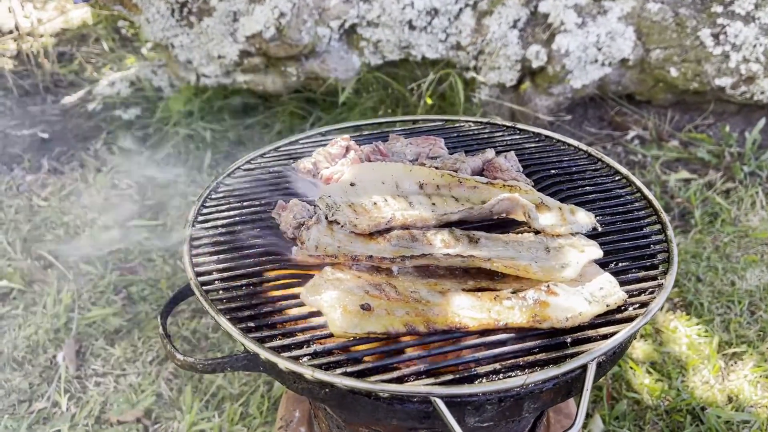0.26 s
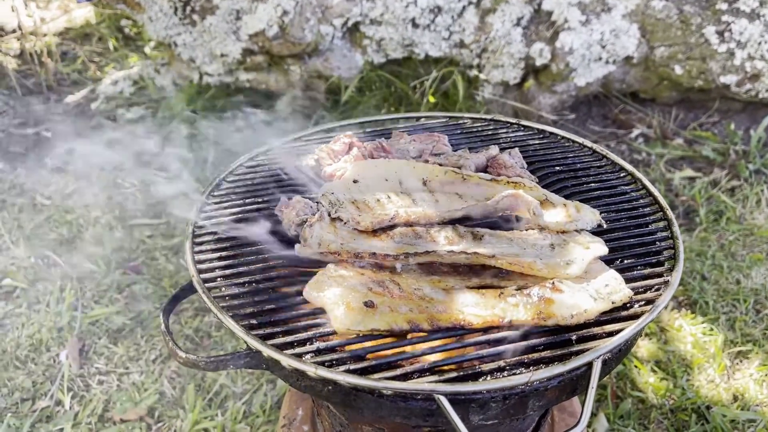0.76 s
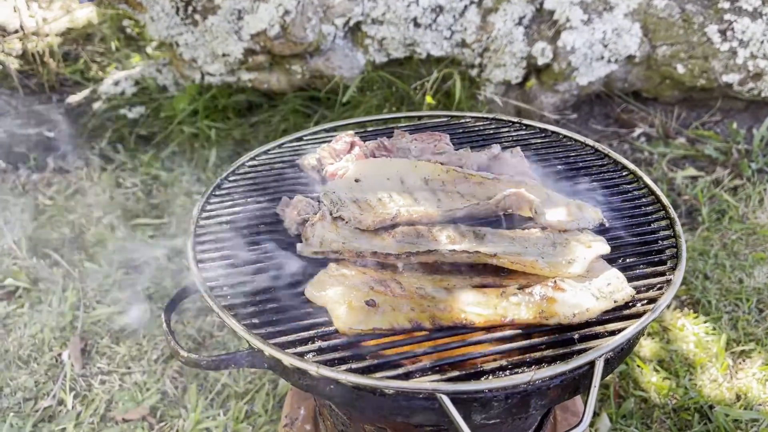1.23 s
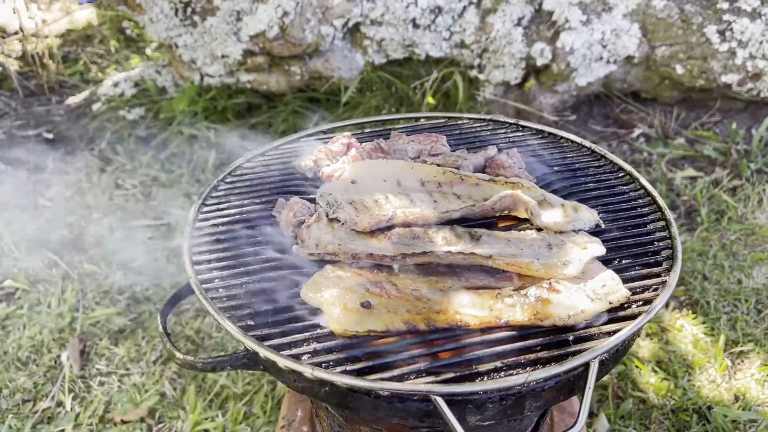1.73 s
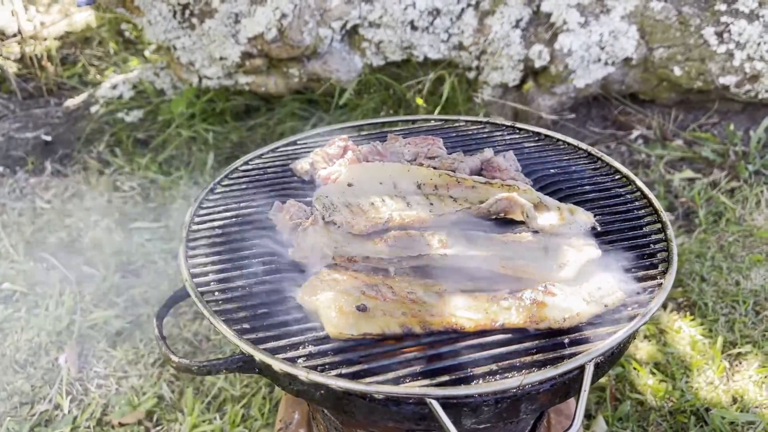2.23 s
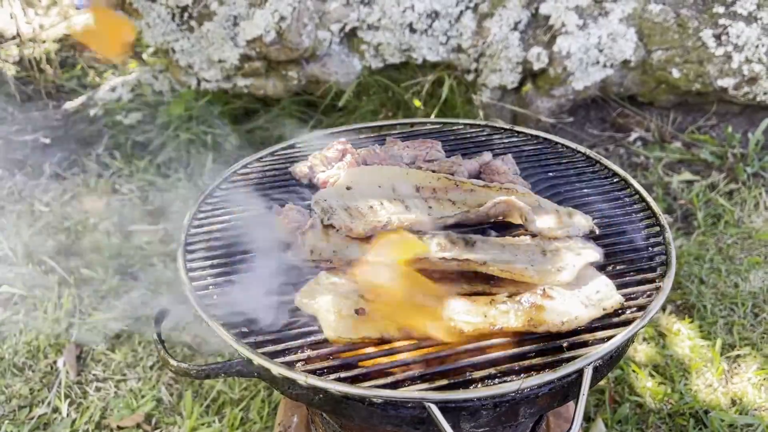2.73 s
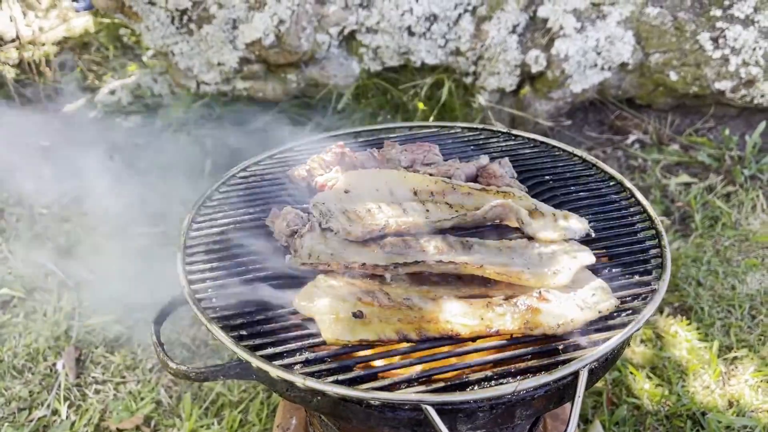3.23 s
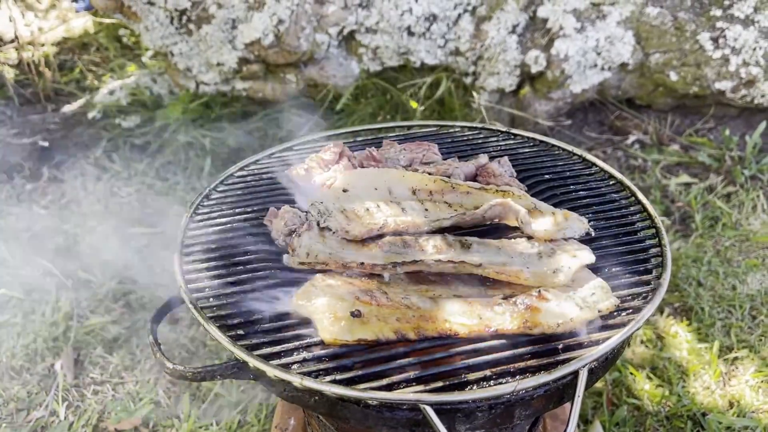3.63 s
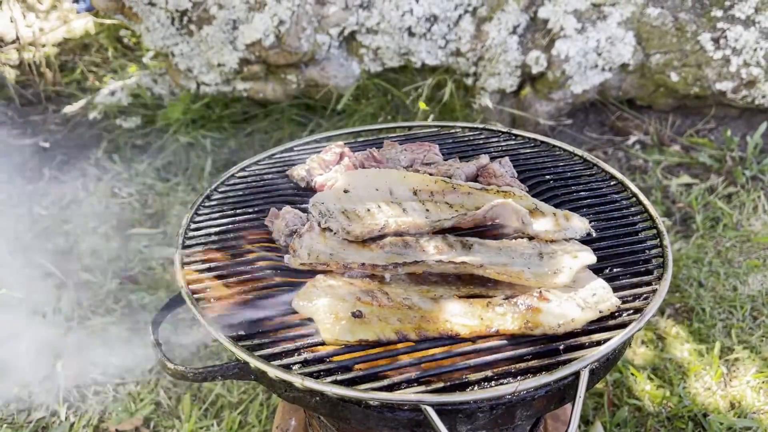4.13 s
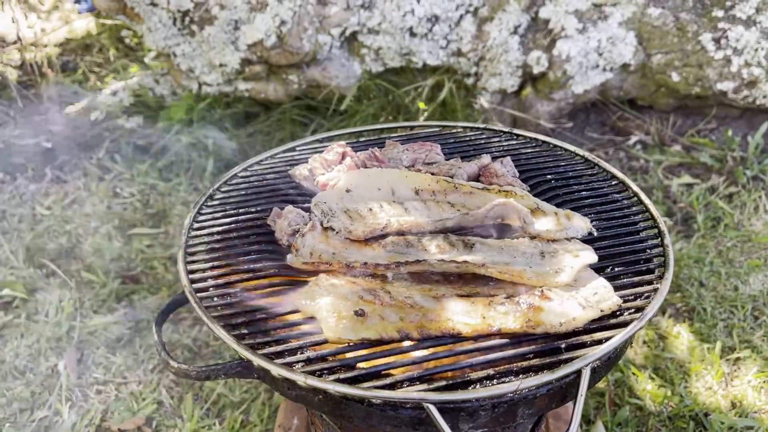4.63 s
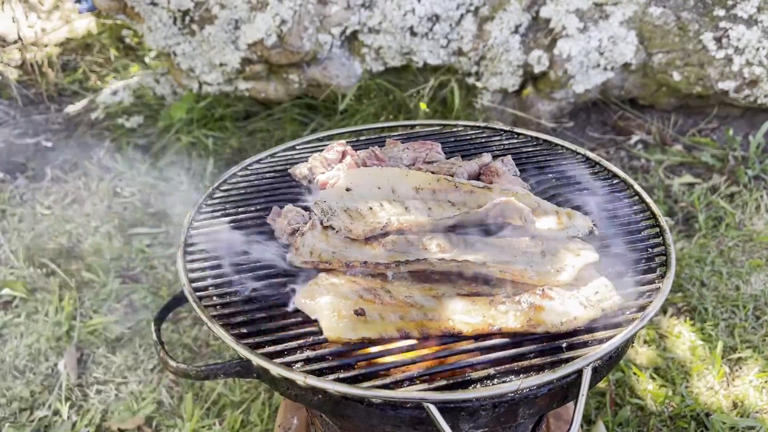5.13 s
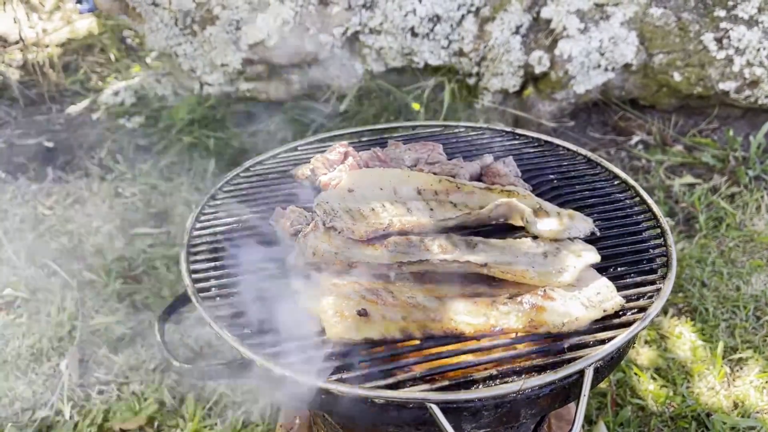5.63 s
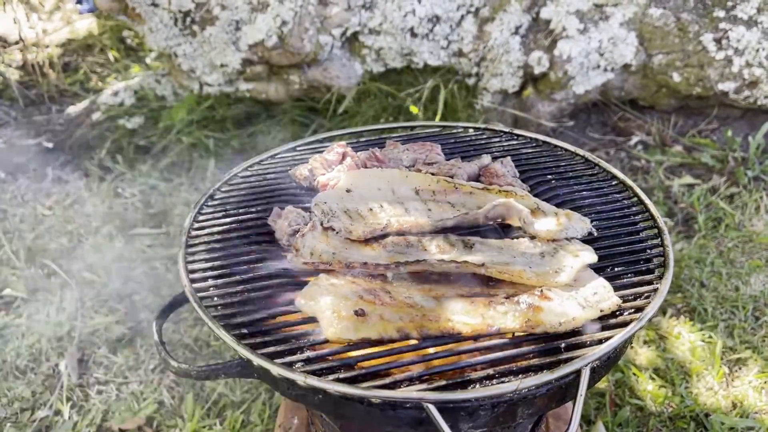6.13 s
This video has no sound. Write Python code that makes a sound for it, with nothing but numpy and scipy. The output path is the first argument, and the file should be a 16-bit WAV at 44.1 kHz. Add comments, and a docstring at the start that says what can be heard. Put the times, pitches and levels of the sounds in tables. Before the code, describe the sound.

Close outdoor stereo pickup of meat frying over hot coals: dense, fine, treble-rich crackling, airy steam and irregular sharp fat pops. The opening is fairly quiet with little wind. Midway, dripping fat makes the sizzle surge, and gusts slap the microphone with low, rough thumps. Later the wind weakens but returns in bumps, over louder sizzling and a slightly hollow rush from the metal bowl.

```python
"""Fatty meat sizzles and pops over charcoal outdoors while gusts buffet a close two-port microphone.
Clumped bubble bursts on a smooth hiss make the sizzle of the fat, lit up by the microphone's treble
resonance, the steam on the coals and the rush in the hollow of a round steel bowl; bigger bubbles snap
and ring the bowl. Wind is coloured noise that swells in lumps, with single eddies that slap the ports;
a faint murmur lies behind. The two channels differ in level and phase."""
import sys
import numpy as np
from scipy.fft import rfft, irfft, next_fast_len
from scipy.io import wavfile
from scipy.ndimage import map_coordinates

SR = 44100
rng = np.random.default_rng(int(sys.argv[2]) if len(sys.argv) > 2 else 0)


def wrap_up_sound(samples):
    """Save the sound to the file named by the first command line argument, as 16-bit audio."""
    columns = np.atleast_2d(samples).T
    # keep every value between -1 and 1, then stretch to whole-number steps
    tamed = np.clip(columns, -1, 1)
    steps = np.round(tamed * 32767).astype(np.int16)
    wavfile.write(sys.argv[1], SR, steps)


N = 281358

# colour of the sizzle as the microphone hears it, with its resonance near 11 kHz:
# [f/Hz, relative density/dB]
SIZZLE_COLOUR = [(3000, -26.5), (6500, -19.5), (8400, -11), (10200, -3), (11000, 0.5), (11600, -1.5),
                 (12300, -11), (13200, -20), (15300, -29)]
# colour of the wind's flutter and of the air in a slap: [f/Hz, relative density/dB]
FLUTTER_COLOUR = [(100, -27.5), (200, -1.5), (330, -0.5), (550, -6), (800, -21.5), (1500, -34),
                  (4000, -78.5)]


def grill():
    """Bubble bursts in three colours plus big pops; row 0 is straight sound, row 1 scattered sound."""
    # colour of the steam: [f/Hz, relative density/dB]
    steam_colour = [(300, -22.5), (800, -17), (1330, -11.5), (1520, 1.5), (1800, 1), (2300, -1.5),
                    (3300, -1), (4200, -4.5), (5500, -3.5), (7000, -8), (10000, -9)]
    # big bubbles: [t/s, relative snap level/dB, relative body level/dB, body pitch f/Hz]
    big_bubbles = [(0.1438, -22, -38, 2310), (0.1508, -27.5, -35.0, 2920), (0.1756, -23.5, -40, 2700),
                   (0.2134, -30, -37.5, 3150), (0.2283, -24.5, -35.5, 3670), (0.2417, -38.5, -34, 3550),
                   (0.2826, -19, -37, 3860), (0.2931, -28.5, -30.5, 2660), (0.3713, -19.5, -39.5, 3300),
                   (0.4093, -21.5, -28, 3450), (0.5705, -23.5, -33, 3770), (0.5767, -30.5, -36, 2410),
                   (0.621, -28.5, -34, 2960), (0.6385, -22, -34, 3810), (0.7218, -16.5, -31, 3260),
                   (0.781, -36, -31.5, 3360), (0.8278, -26.5, -29.5, 2340), (0.843, -34, -35, 3850),
                   (0.8731, -24.5, -40.5, 3630), (0.9076, -27.5, -32, 4310), (1.0005, -19.5, -35, 4150),
                   (1.0232, -22.0, -34, 4020), (1.0433, -21.5, -33, 4830), (1.1085, -22.5, -42, 4170),
                   (1.3263, -24, -36.0, 4350), (1.3617, -21.5, -50.5, 4460), (1.3817, -40.5, -35.5, 3540),
                   (1.6178, -27.5, -38, 4730), (1.7475, -27, -37, 3360), (1.7772, -26, -33.0, 3550),
                   (1.8507, -24, -40, 4130), (1.9256, -26.5, -31.5, 2440), (1.9361, -37, -31, 3660),
                   (1.954, -33.5, -30, 2400), (1.9831, -18.5, -30, 2360), (2.0097, -31.5, -31, 2350),
                   (2.065, -22.5, -29, 2210), (2.099, -21.5, -36, 2000), (2.1125, -16, -36, 3880),
                   (2.1466, -19.5, -29, 2735), (2.1927, -19.5, -28.5, 3960), (2.2478, -21, -24.5, 3670),
                   (2.2803, -22.5, -29, 2640), (2.3242, -29, -32, 4040), (2.3489, -21, -29.5, 3280),
                   (2.383, -29, -35.5, 3980), (2.4001, -20.5, -36, 4940), (2.4121, -31.5, -31, 4160),
                   (2.438, -22.5, -39.0, 3800), (2.4814, -24.5, -28, 3200), (2.4878, -29, -35, 3560),
                   (2.4963, -31.5, -38, 4010), (2.6354, -25, -25, 2830), (2.6875, -21.5, -26, 2180),
                   (2.7137, -17.0, -38.5, 3060), (2.8554, -31, -27, 2170), (3.038, -24, -28, 3090),
                   (3.1466, -31, -28.5, 2290), (3.2055, -16, -36, 4450), (3.2833, -30.0, -29.0, 2060),
                   (3.4108, -25.5, -26.5, 2410), (3.4204, -16, -28.5, 2450), (3.4249, -18.5, -25, 3200),
                   (3.793, -16, -25.5, 3080), (3.833, -15, -16.5, 2760), (3.855, -18, -28.5, 3170),
                   (3.8971, -19, -30.5, 3170), (3.989, -24.5, -27.5, 3640), (4.0872, -30.5, -25, 2140),
                   (4.1558, -22.5, -32, 3150), (4.2149, -20.5, -25.5, 3700), (4.2777, -19, -23.5, 3300),
                   (4.3035, -29.5, -24.5, 2660), (4.3294, -23.5, -28.5, 2100), (4.3701, -14, -23.5, 2810),
                   (4.5428, -31, -25, 2260), (4.5718, -30.0, -24, 2000), (4.6062, -20.0, -24.5, 2660),
                   (4.6122, -14.5, -27.5, 3000), (4.6168, -15, -26.5, 2870), (4.6481, -22.5, -26, 2170),
                   (4.7966, -13, -27.0, 2340), (4.98, -27.5, -30, 3210), (5.1347, -27.5, -33, 2300),
                   (5.2352, -20, -30, 3480), (5.3, -33, -27.5, 3220), (5.5651, -22.5, -22, 2330),
                   (5.7835, -23.5, -31, 2390), (5.7902, -14.0, -36, 3940), (5.885, -25, -24.5, 2650),
                   (5.8932, -14.0, -27, 3240), (5.9799, -16.5, -23.5, 2690), (6.0192, -23.5, -26.5, 2300),
                   (6.0869, -25, -27.5, 2300), (6.0948, -27.5, -23, 2110), (6.1554, -18.5, -19.5, 3660),
                   (6.2363, -20.5, -33, 2600)]
    fat_db, steam_db, rush_db = fire()
    fat = filtered(bursting(per_s=1500, spread_db=2.8, smooth=1.0, clumps_db=1.5), causal(SIZZLE_COLOUR))
    steam = filtered(bursting(per_s=900, spread_db=5.5, smooth=1.34, clumps_db=2.0), causal(steam_colour))
    rush = filtered(bursting(per_s=300, spread_db=4, smooth=1.6, clumps_db=1.4), hollow)
    layers = amp(fat_db) * unit(fat) + amp(steam_db) * unit(steam)
    layers += amp(rush_db + 0.65) * unit(rush)
    return layers + pops(big_bubbles)


def fire():
    """Slow levels in dB; fat that drips on the coals and spits swells both sizzle and steam."""
    # heat over time: [t/s, relative fat sizzle level/dB, relative steam level/dB, relative rush level/dB]
    heat = [(0, -37, -54.5, -61), (.5, -37, -54, -66.5), (.95, -40, -55, -61), (1.25, -41, -57.5, -67),
            (1.9, -38, -54.5, -65.5), (2.54, -37, -53.5, -58.5), (2.75, -33.5, -48, -55),
            (3.05, -32, -44, -62.5), (3.4, -29.5, -46.5, -49.5), (3.7, -33.5, -48, -55.5),
            (4.0, -32, -48.5, -56), (4.3, -32, -45.5, -52), (4.55, -33, -43.5, -46),
            (4.9, -32, -45.5, -46.5), (5.44, -36, -46.5, -48.5), (5.6, -33.5, -46.5, -45),
            (6.05, -35, -46, -41), (6.38, -35, -46, -47.5)]
    # spits of dripping fat: [t/s, swell/dB, time to fade/s]
    spits = [(.3, 4.5, 0.0255), (.385, 4, 0.042), (1.01, 1.5, 0.084), (2.18, 4, 0.057), (2.43, 3.5, 0.073),
             (2.689, 3, 0.105), (3.04, 1.5, 0.044), (4.61, 6.5, 0.0514), (5.53, 3.5, 0.055),
             (5.79, 5.5, 0.0174), (6.02, 3, 0.07), (6.36, 4, 0.0166)]
    spit_rise = 1  # rise over fade time
    steam_share = 0.93  # swell of the steam over that of the fat, in dB
    fat_db, steam_db, rush_db = curves(heat)
    swell_db = 0.5 * wobble(22)  # chance swells
    for s, db, fade_s in spits:
        swell_db += db * np.maximum(1 - tent(s, fade_s, spit_rise), 0)
    return fat_db + swell_db, steam_db + steam_share * swell_db, rush_db + 2.5 * wobble(25)


def bursting(per_s, spread_db, smooth, clumps_db):
    """Two streams of bubble bursts, few large and many small, in clumps, on a smooth hiss."""
    largest = 3  # cap on the random size, in spreads
    size = amp(spread_db * np.minimum(rng.exponential(size=(2, N)), largest))
    size *= rng.uniform(-0.773, 1, (2, N))  # pushes outweigh pulls
    bursts = unit(size * (rng.random((2, N)) < per_s / SR))
    clumps = amp(clumps_db * (0.443 * wobble(17) + wobble(70)))
    hiss = smooth * rng.standard_normal((2, N))
    return unit(clumps * (bursts + hiss))


def pops(bubbles):
    """Each big bubble gives a sharp snap, a little spray and one swing of its cavity, which rings the bowl."""
    length = 256
    ring_db = 24  # the bowl's answer to a pop
    t = np.arange(length) / SR
    click = np.array([[1], [0]]) * (t == 0)  # straight sound only
    snaps, bodies = np.zeros((2, N + length)), np.zeros((2, N + length))
    for s, snap_db, body_db, hz in bubbles:
        start = round(s * SR)
        at = slice(start, start + length)
        noise = rng.standard_normal((2, length))
        # both sprays fall by 60 dB in a few milliseconds
        snap_spray = 0.11 * noise * amp(-60 * t / 0.0035)
        body_spray = 0.033 * noise * amp(-60 * t / 0.0056)
        snaps[:, at] += amp(snap_db) * (click + snap_spray)
        swing = np.sin(2 * np.pi * hz * t) * np.exp(-(hz * t / 0.905) ** 2)
        scattered_swing = 0.296 * np.roll(swing, 12)  # 12 samples later
        bodies[:, at] += amp(body_db + 1.5) * ([swing, scattered_swing] + body_spray)

    def crisp(hz):
        return causal(SIZZLE_COLOUR)(hz) * (1j * hz / (9000 + 1j * hz))

    def dull_and_ringing(hz):
        dull = 1j * hz / (600 + 1j * hz) / (1 + 1j * hz / 7500)
        return dull + amp(ring_db) * hollow(hz) / (1 + 1j * hz / 800) ** 2

    return amp(23) * filtered(snaps[:, :N], crisp) + filtered(bodies[:, :N], dull_and_ringing)


def hollow(hz):
    """The air in the bowl resonates in a few broad modes, summed with alternating sign."""
    # air modes of the bowl: [f/Hz, width/Hz, relative level/dB]
    modes = [(528.3, 105, -1), (605.6, 216, -7.5), (1109, 189, -14), (1716, 290, -15.5), (2076, 508, -17)]
    response = 0
    for k, (centre, width, db) in enumerate(modes):
        damping = 1j * hz * width
        response = response + (-1) ** k * amp(db) * damping / (centre ** 2 - hz ** 2 + damping)
    return response


def wind():
    """Eddies roll over the ports in lumps; the flutter comes in sharper lumps than the buffet."""
    # colour of the low buffet before its lumps and lift: [f/Hz, relative density/dB]
    buffet_colour = [(22, -25), (40, -1), (62, 4.5), (90, 2), (140, -1), (220, -7.5), (400, -27.5),
                     (900, -53)]
    buffet_db, flutter_db = gusts()
    eddies = wobble(35)
    buffet = filtered(rng.standard_normal((2, N)), causal(buffet_colour))
    buffet = unit(buffet * amp(2.95 * eddies))
    deep = filtered(buffet, lambda hz: 1 / (1 + (hz / 95) ** 4))
    lift = amp(0.18 * (buffet_db + 33.5))  # a stronger gust is faster, so its rumble sits higher
    rumble = amp(buffet_db + 0.88) * (deep / lift + (buffet - deep) * lift)
    flutter = filtered(rng.standard_normal((2, N)), causal(FLUTTER_COLOUR))
    flutter = unit(flutter * amp(2 * eddies + 3.5 * wobble(110)))
    return rumble + amp(flutter_db + 0.98) * flutter + slaps()


def gusts():
    """Relative levels of buffet and flutter in dB: gusts rise and fade, their power added to the breeze."""
    # breeze between the gusts: [t/s, relative buffet level/dB, relative flutter level/dB]
    breeze = [(0, -59.5, -61.5), (.85, -60, -61.5), (1.49, -65, -66.5), (2.0, -58, -61.5),
              (2.3, -47, -62.5), (2.55, -55, -57), (2.7, -42.5, -49.5), (3.1, -39.5, -47),
              (3.3, -36.5, -55.5), (3.6, -36.5, -46.5), (3.85, -33.5, -45), (4.1, -35, -47),
              (4.5, -44, -48), (4.75, -43, -50.5), (5.0, -36, -44.5), (5.3, -42.5, -51),
              (5.6, -48.5, -49.5), (5.9, -44.5, -46.5), (6.1, -56, -47.5), (6.38, -43.5, -50)]
    # gusts: [t/s, relative peak level/dB, time to fade by 20 dB/s]
    gust_rows = [(1.57, -44, 0.06), (2.83, -30.5, 0.0037), (2.97, -27, 0.18), (3.04, -22.5, 0.1),
                 (3.141, -25.5, 0.09), (3.2, -26, 0.06), (3.41, -32, 0.15), (3.65, -28, 0.187),
                 (3.725, -22, 0.1048), (3.84, -31, 0.1437), (4.39, -33, 0.0945), (4.9, -27.5, 0.0739),
                 (5.08, -35.5, 0.32), (5.23, -36.5, 0.02), (5.67, -43, 0.52), (5.9, -38, 1.15)]
    gust_rise, flutter_under_gust_db = 0.775, -15.5  # rise over fade time; flutter relative to gust
    buffet_db, flutter_db = curves(breeze)
    gust = sum(amp(db - 20 * tent(s, fade_s, gust_rise)) ** 2 for s, db, fade_s in gust_rows)
    buffet_power = amp(buffet_db) ** 2 + gust
    flutter_power = amp(flutter_db) ** 2 + gust * amp(flutter_under_gust_db) ** 2
    return 10 * np.log10(buffet_power), 10 * np.log10(flutter_power)


def slaps():
    """Each eddy pushes and pulls the membrane a few times inside a short rough puff of air."""
    # single eddies that slap the ports: [t/s, relative level/dB, pitch f/Hz]
    eddy_rows = [(.434, -44, 84.8), (.552, -37.5, 483), (0.581, -35.5, 473), (.615, -38, 470),
                 (0.65, -32.5, 84.1), (.677, -36.5, 93.5), (.712, -35, 66), (0.783, -40.5, 89),
                 (.92, -43, 93.5), (1.568, -33, 151.6), (2.255, -37.5, 90), (2.285, -39, 99.3),
                 (2.338, -34.5, 98.5), (2.598, -30, 105), (2.638, -32.5, 346), (2.681, -28.5, 110),
                 (2.818, -34.5, 203), (2.915, -26.5, 194.5), (2.958, -17.5, 207.2), (2.97, -21, 255.4),
                 (2.996, -18, 243.4), (3.018, -16, 268), (3.044, -12, 173), (3.065, -17.5, 122.2),
                 (3.076, -27, 279), (3.132, -17, 295), (3.141, -17, 124.8), (3.16, -23.5, 300),
                 (3.2, -29, 321), (3.227, -25.5, 200.5), (3.472, -14, 88.35), (3.625, -20, 208.7),
                 (3.636, -21, 422), (3.645, -20, 219), (3.673, -14.5, 401), (3.679, -15.5, 295),
                 (3.686, -20.5, 560), (3.696, -9.5, 416), (3.701, -19.5, 451), (3.71, -17.5, 484),
                 (3.724, -8, 369.3), (3.748, -16.5, 438.6), (3.756, -17.5, 508), (3.762, -11.5, 299.7),
                 (3.78, -19.5, 258), (3.806, -12, 459), (3.816, -25, 417), (3.829, -23.5, 316),
                 (3.842, -17, 212), (3.933, -16, 105), (4.011, -23, 235.6), (4.053, -23.5, 509.6),
                 (4.076, -16, 338), (4.36, -24.5, 233), (4.377, -17, 302.3), (4.467, -25.5, 96.8),
                 (4.494, -21, 96.1), (4.517, -23, 80.4), (4.584, -24.5, 88.6), (4.66, -31.5, 200),
                 (4.725, -30, 150.3), (4.897, -20, 231), (4.911, -17, 219.5), (4.931, -27.5, 260),
                 (4.938, -20.5, 100.2), (5.055, -24, 391), (5.062, -22.5, 95.6), (5.09, -26.5, 254),
                 (5.099, -26.5, 89.5), (5.171, -30.5, 299.2), (5.23, -23.5, 287.7), (5.348, -26, 332.6),
                 (5.353, -25, 105.8), (5.555, -22.5, 85.2), (5.659, -25.5, 94.4), (5.792, -30.5, 105.3),
                 (5.897, -26, 170.4), (5.925, -23.5, 300), (5.96, -21, 234.2), (6.155, -25.5, 147.4),
                 (6.277, -28.5, 189.4), (6.286, -20.5, 162.6), (6.305, -24.5, 259)]
    slap_rise = 0.61  # rise over fade
    half = 3072  # samples on each side of the slap
    t = np.arange(-half, half) / SR
    late = np.maximum(t, -t / slap_rise)
    air = unit(filtered(rng.standard_normal((2, N)), causal(FLUTTER_COLOUR)))
    out = np.zeros((2, N + 2 * half))
    for s, db, hz in eddy_rows:
        start = rng.random()
        cycle = 2 * np.pi * (hz * t + start + np.array([[0], [.25]]))  # quarter turn between the rows
        push = np.sin(cycle) + 0.192 * np.sin(2.052 * cycle)
        push = push * np.exp(-(hz * late / 0.988) ** 2)
        # the front of the eddy passes as one flick, sharper in a fast eddy
        edge = t * hz / 0.105
        push = push + (hz / 450) ** 2 * edge * np.exp(-edge ** 2)
        # a faster eddy carries its ripples past sooner
        passing = (start * N / 2 + SR / 4) + t * SR * hz / 240
        ripples = np.array([np.interp(passing, np.arange(N), row) for row in air])
        puff = ripples * np.exp(-(late * hz / 2.308) ** 2)
        slap = amp(db - 4.5) * push * [[1], [.7]] + amp(db - 11) * puff
        at = round(s * SR)
        out[:, at:at + 2 * half] += slap
    return out[:, half:half + N]


def murmur():
    """A faint distant murmur of outdoor air: steady coloured noise, independent at each port."""
    # colour of the distant air: [f/Hz, relative density/dB]
    far_colour = [(150, -12.5), (400, -11), (700, -4.5), (1000, 1.5), (1400, -4), (2500, -26), (6000, -50)]
    return amp(-62.5) * unit(filtered(rng.standard_normal((2, N)), causal(far_colour)))


def amp(db):
    """Amplitude factor of a level in dB."""
    return 10 ** (np.asarray(db) / 20)


def unit(x):
    """Scale to an overall RMS of one."""
    return x / np.sqrt(np.mean(x ** 2) + 1e-20)


def along(points, hz):
    """Interpolate (Hz, value) points on a log frequency axis."""
    f, v = np.transpose(points)
    return np.interp(np.log(hz + 1), np.log(f + 1), v)


def curves(rows):
    """One value per sample for each column after the time."""
    s, *cols = np.transpose(rows)
    return [np.interp(np.arange(N) / SR, s, c) for c in cols]


def tent(s, fade_s, rise):
    """Distance from moment s in fade times; the rise takes a share of the fade time."""
    t = np.arange(N) / SR - s
    return np.maximum(t, -t / rise) / fade_s


def wobble(rate):
    """A smooth random curve with rate knots a second."""
    return map_coordinates(rng.standard_normal(N // 40), [np.arange(N) * rate / SR])


def filtered(x, response):
    """Apply a complex frequency response to x."""
    m = next_fast_len(N + 8192)
    return irfft(rfft(x, m) * response(np.fft.rfftfreq(m, 1 / SR)), m)[..., :N]


def causal(spectrum):
    """Minimum-phase response with this colour: it rings only after its cause."""
    def response(hz):
        ceps = irfft(np.log(amp(along(spectrum, hz))))
        # fold the cepstrum onto positive time
        ceps[1:len(hz) - 1] *= 2
        ceps[len(hz):] = 0
        return np.exp(rfft(ceps))
    return response


def spread(pair, alike):
    """Mix straight and scattered sound so that the ports are as alike as asked when both are equally strong."""
    def shares(hz):
        turn = np.arccos(np.clip(along(alike, hz), -1, 1)) / 2
        return np.array([np.cos(turn), np.sin(turn)])
    mid, side = filtered(pair, shares)
    return np.array([mid + side, mid - side])


def scene():
    """The grill, the wind on the ports and a faint far background unlike at each port."""
    # likeness of the grill at the two ports: [f/Hz, correlation]
    grill_alike = [(60, 0.7629), (200, 1), (500, 0.953), (1200, 0.835), (1900, 0.943), (3200, 0.738),
                   (5600, 0.642), (7200, 0.747), (8600, 0.92), (11500, 1), (12800, 0.7), (15000, 1)]
    # likeness of the wind at the two ports: [f/Hz, correlation]
    wind_alike = [(60, 0.783), (150, 0.9), (400, 0.961), (1200, 0.766)]
    return spread(grill(), grill_alike) + spread(wind(), wind_alike) + murmur()


def record(dry):
    """The channels differ in level and phase; nothing is kept above the band limit."""
    # rough stepped phase offset between the channels: [f/Hz, left lead/rad]
    phase_offset = [(60, 0), (200, .35), (800, .05), (1950, 0), (3100, .8), (4100, .2), (5700, -.3),
                    (7000, 0), (7800, .7), (8600, 0), (9400, -1.8), (10200, -3.14), (11800, -6.1),
                    (12400, -6.5), (13300, -9.3), (14300, -9.5), (15000, -12.5)]
    # level of the left channel over the right: [f/Hz, difference/dB]
    left_louder = [(400, 0), (860, 2.5), (1550, 3.5), (1900, 1), (2700, 3), (4300, 0.5), (5500, 3),
                   (6400, 0), (16000, 0)]
    top_hz = 15650
    half = np.array([[.5], [-.5]])  # each channel takes half the difference

    def channels(hz):
        level = amp(half * along(left_louder, hz))
        phase = np.exp(1j * half * along(phase_offset, hz))
        return level * phase * (hz < top_hz)

    return filtered(dry, channels)


dry = scene()
out = record(dry)
wrap_up_sound(out)
```